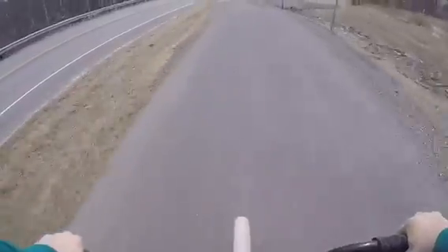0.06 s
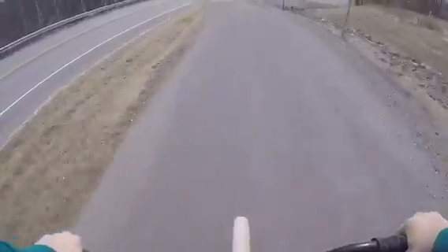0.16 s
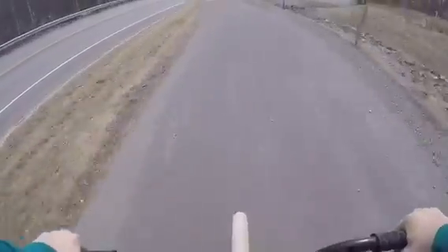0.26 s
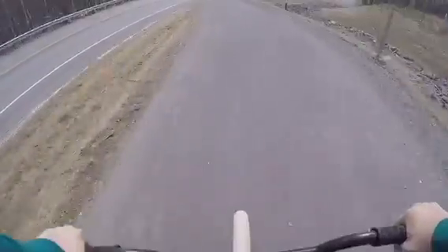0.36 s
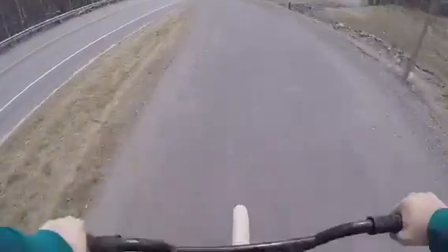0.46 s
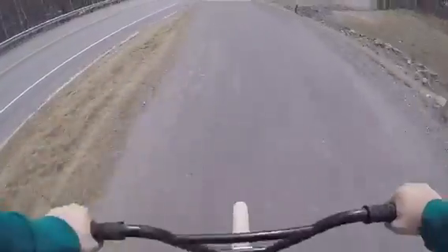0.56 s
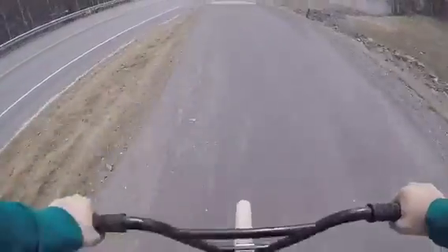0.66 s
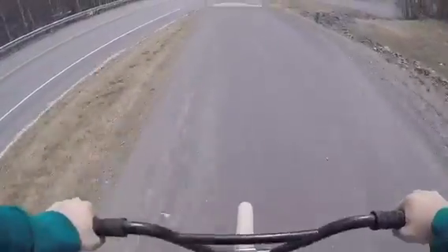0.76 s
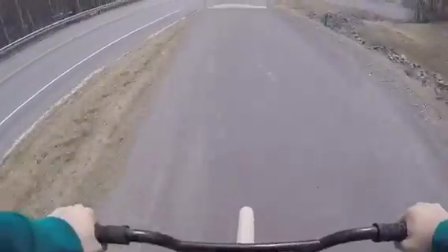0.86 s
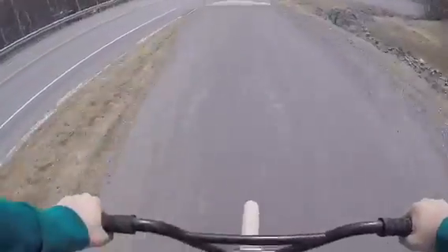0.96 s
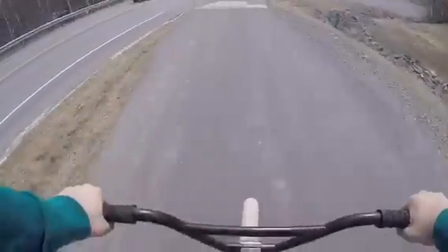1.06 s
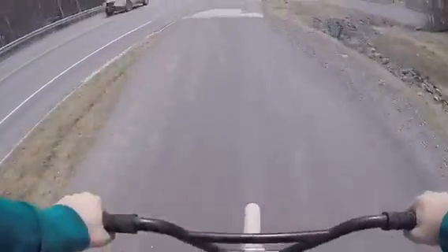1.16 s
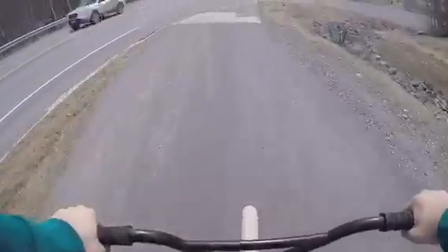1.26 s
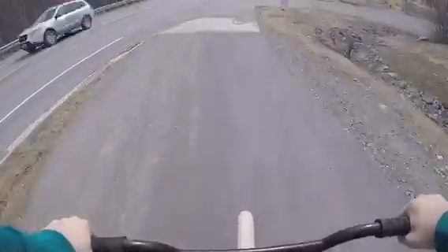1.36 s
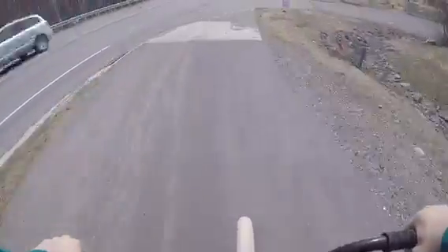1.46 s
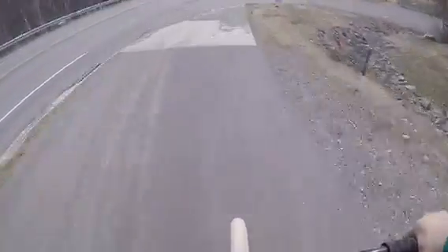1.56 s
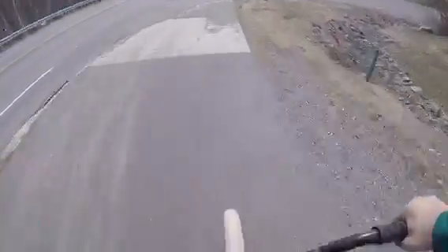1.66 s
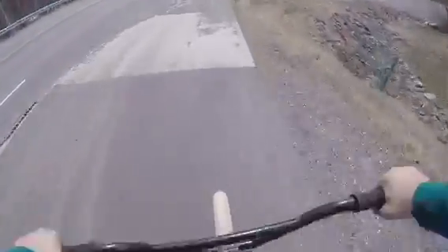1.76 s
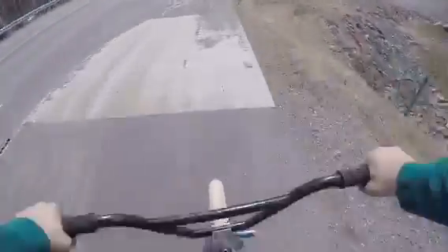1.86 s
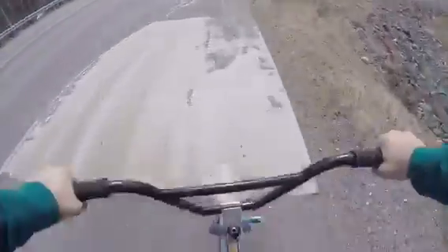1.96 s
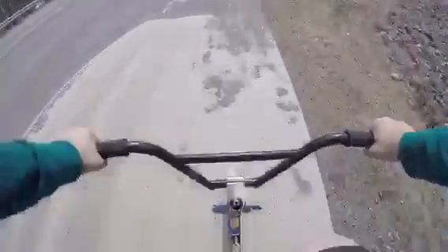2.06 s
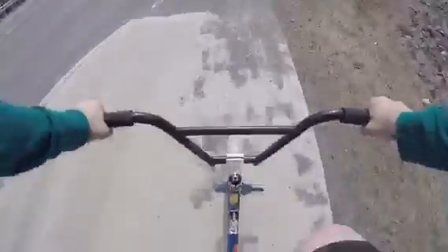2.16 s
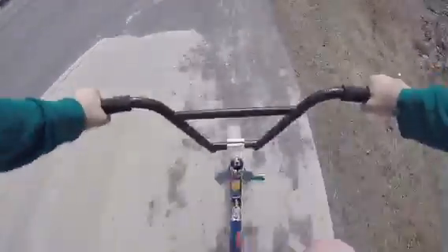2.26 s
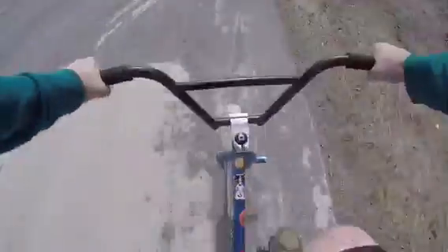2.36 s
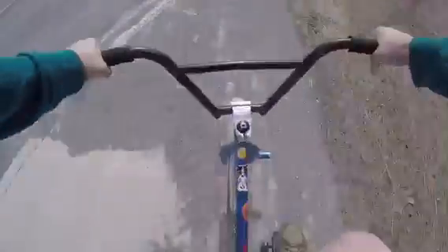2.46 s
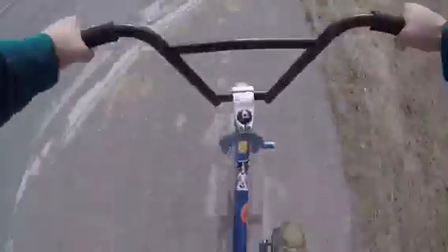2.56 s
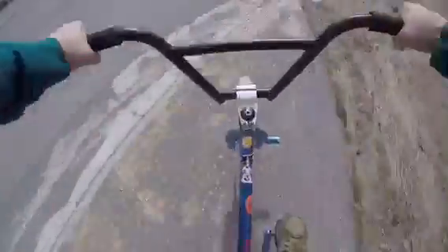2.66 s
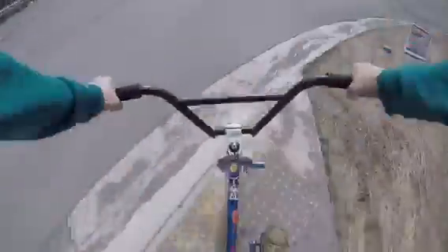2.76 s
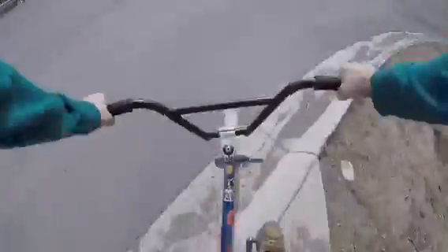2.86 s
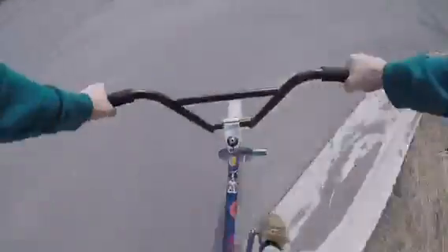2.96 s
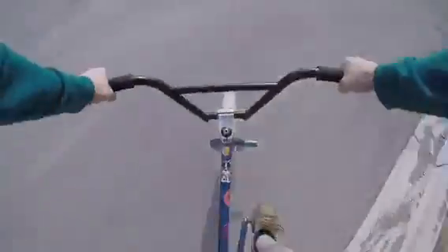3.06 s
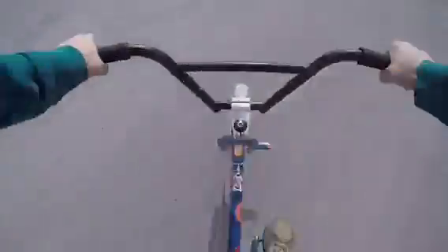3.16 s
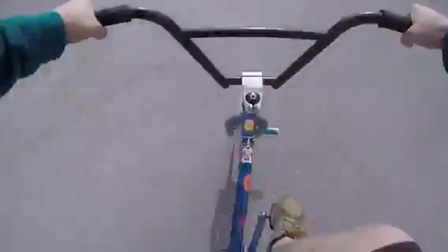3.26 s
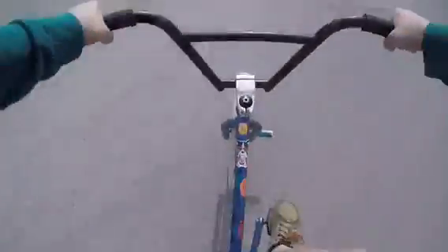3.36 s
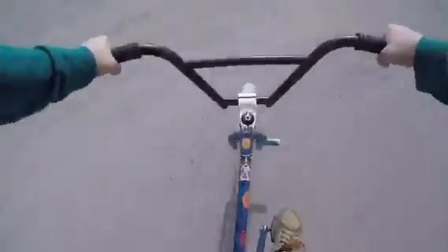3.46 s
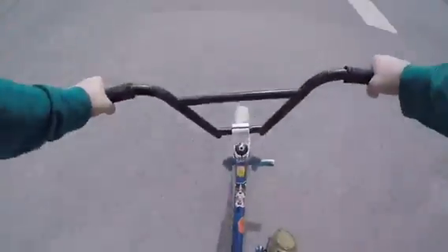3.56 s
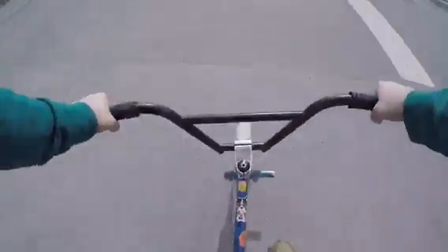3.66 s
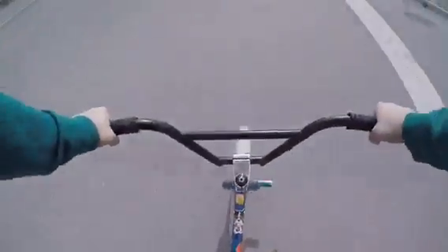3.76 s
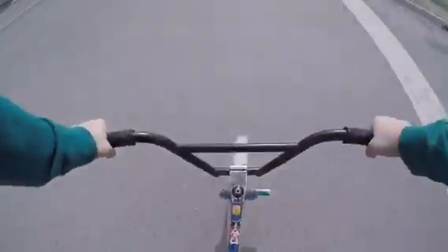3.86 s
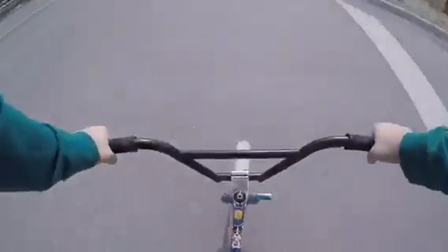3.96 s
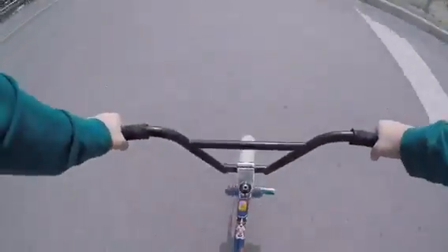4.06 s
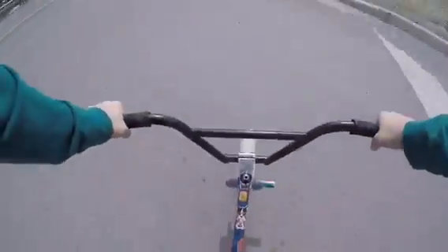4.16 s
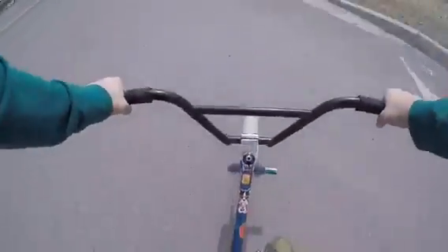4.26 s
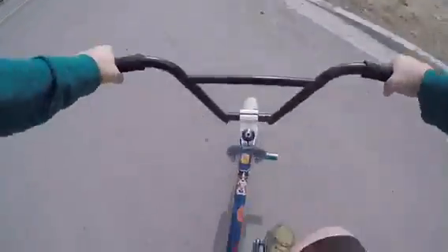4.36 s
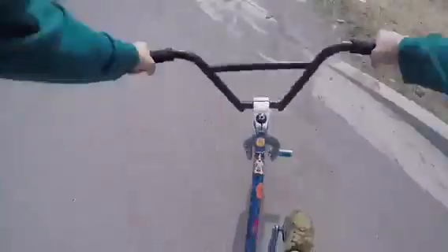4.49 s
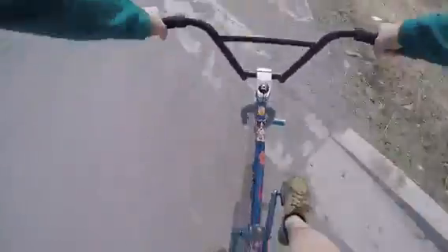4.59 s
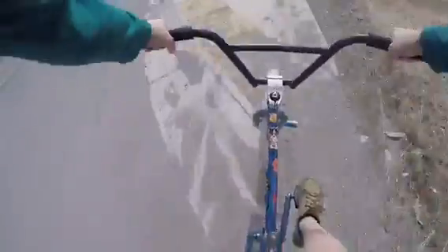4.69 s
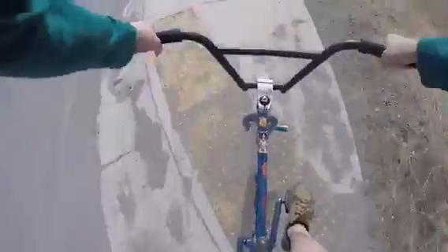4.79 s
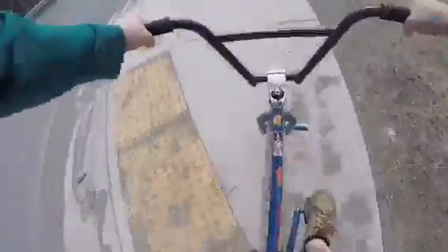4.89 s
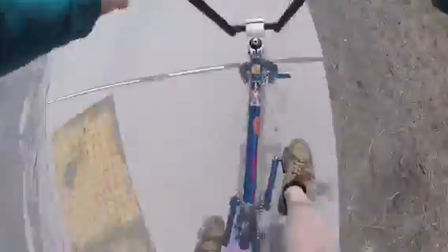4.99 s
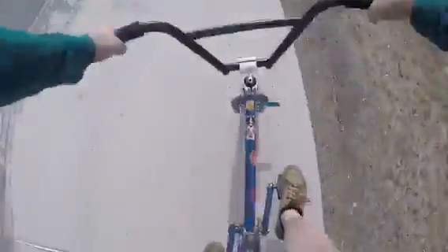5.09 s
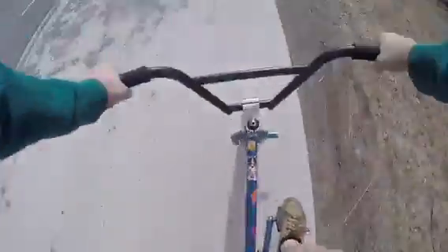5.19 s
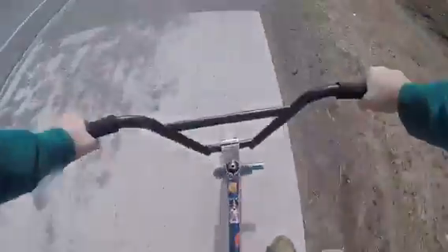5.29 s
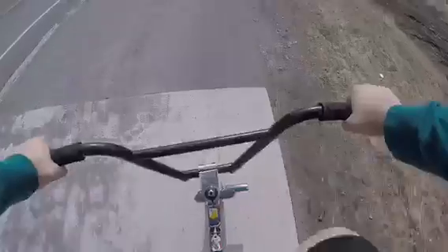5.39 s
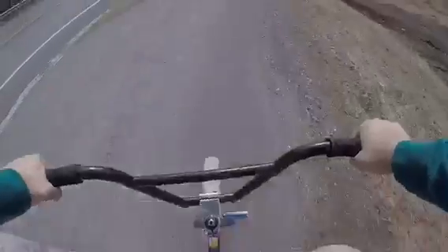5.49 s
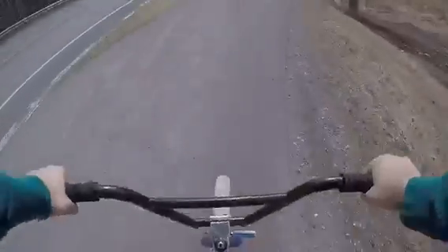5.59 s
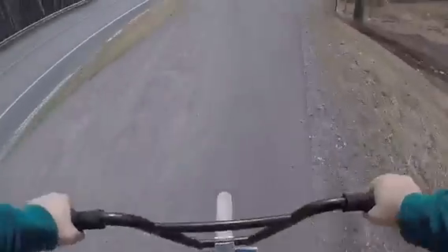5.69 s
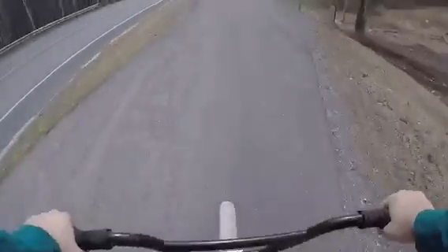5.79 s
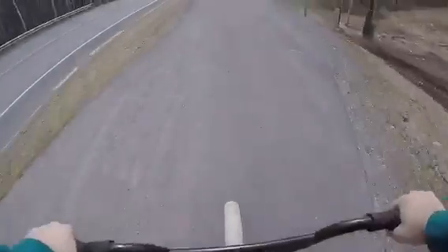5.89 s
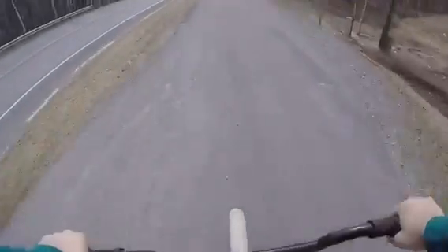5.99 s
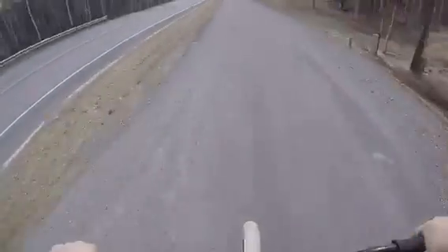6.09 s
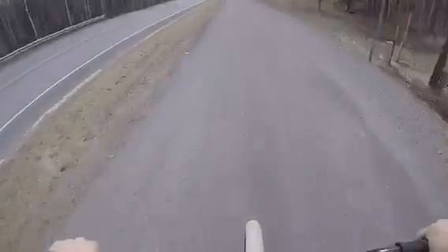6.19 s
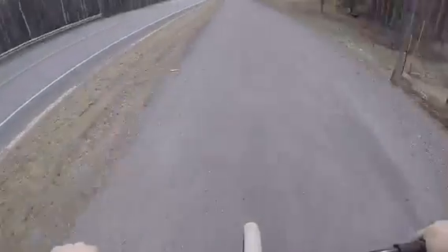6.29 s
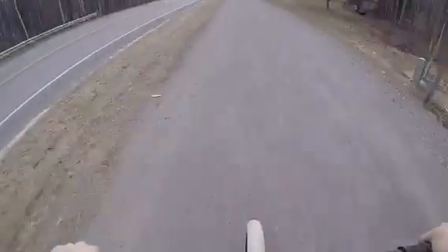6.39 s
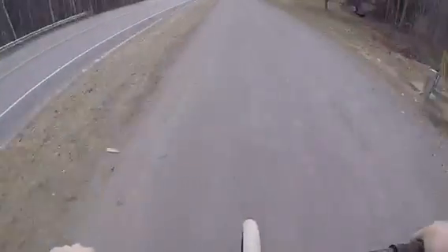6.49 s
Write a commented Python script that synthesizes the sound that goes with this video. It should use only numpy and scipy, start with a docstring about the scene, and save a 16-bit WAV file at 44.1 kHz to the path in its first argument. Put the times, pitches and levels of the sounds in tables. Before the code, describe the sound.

A small bike rolls fast down a paved hill, heard close from a cased camera on the rider's chest. Tyre rush, thin air hiss and low gusting wind run throughout. From about 0.4 to 1.6 seconds the rim brake scrapes and squeals in high, wavering, stuttering chirps. A car passes faintly around 1.5 to 2.2 seconds. From 2 seconds the tyres grow rougher over grit, and small stones tick on the frame. Jolts begin near 2.6 seconds, building to a hard kerb bang at 3.2, with clacking bike parts, hollow mount knocks and deep thumps. After a smoother second, another cluster starts around 4.5 seconds and peaks with a sharp bang at 5. A few light knocks follow near 5.6 seconds, then steady rolling and wind continue until about 6.5 seconds.

```python
"""A small bike rolls fast down a paved hill: the rim brake scrapes and squeals by stick-slip, then the
tyres rush over grit and bang across two kerbs. Stones tick on the frame; jolts knock the camera mount.
A car passes; wind and body shake rumble below. Heard from a cased camera on the rider's chest,
whose walls colour the noise from outside."""
import sys
import numpy as np
from scipy import signal
from scipy.fft import rfft, irfft
from scipy.io import wavfile
from scipy.ndimage import uniform_filter1d

SR = 44100
rng = np.random.default_rng(int(sys.argv[2]) if len(sys.argv) > 2 else 0)


def unload_wav(signal):
    """Save mono or channel-first audio to the path in sys.argv[1] as 16-bit WAV at rate SR, clipped to [-1, 1]."""
    wavfile.write(
        sys.argv[1],
        SR,
        np.round(np.clip(np.atleast_2d(signal).T, -1, 1) * 32767).astype(np.int16),
    )


N = 288414
TIME_S = np.arange(N) / SR

# camera case resonances: f/Hz, width/Hz, gain/dB
CASE_MODES = [(1098, 87, 2.1), (1613, 116, 6.1), (2241, 31, 2.4), (2405, 48, 6.8), (2656, 35, 3.5),
              (2868, 148, 10.3), (3372, 78, 10.2), (3574, 50, -1.7), (3811, 111, 8.4), (4521, 290, 7.3),
              (5344, 29, 3.1), (5863, 203, -4.8), (6387, 105, 5.9), (6648, 34, 3.9), (7075, 61, 8.1),
              (7663, 137, 5.9), (7923, 40, 7.7), (8367, 230, 8.6), (9416, 66, 5.7), (9789, 779, 8.0),
              (9884, 34, 3.4), (10897, 72, -3.4), (11475, 44, 6.5), (11616, 45, 4.4), (13363, 228, 4.4),
              (13591, 35, 3.8), (13673, 34, 3.7)]
# spectral shapes ahead of the case: f/Hz, relative density/dB
WIND_SPECTRUM = [(4, -35), (15, 8.5), (23, 9.5), (38, -4.5), (55, -11), (85, -34), (160, -29.5), (400, -71)]
CAR_SPECTRUM = [(200, -11.5), (500, -7.5), (750, 4.5), (1200, -13), (1900, 0), (3000, -13), (6000, -50.5)]
AIR_SPECTRUM = [(3000, -10.5), (5500, 7), (8000, 3.5), (10000, 0.5), (12000, 0), (14000, -2.5),
                (15500, -4.5)]
ROAD_SPECTRUM = [(40, 7), (80, 11), (150, 10), (210, -1), (350, 0), (550, -8.5), (900, -1.5), (1350, -8.5),
                 (2500, -24), (6000, -34), (15000, -63.5)]
TREAD_SPECTRUM = [(40, -21.5), (200, -17), (500, -7.5), (900, -7.5), (1350, -12), (2000, -4.5),
                  (2500, -2.5), (4000, -12.5), (5500, -23), (9000, -43), (12000, -54), (15000, -71)]
SCRAPE_SPECTRUM = [(100, -49.5), (300, -26), (550, -24), (850, -7.5), (1350, -12), (1900, -8.5),
                   (2300, 4.5), (2700, -13.5), (3200, -16.5), (4800, -20.5), (5500, -24.5), (8000, -34),
                   (12000, -55.5), (15000, -46)]
OVERTONE_SPECTRUM = [(100, -75), (3200, -22), (3850, -6), (4350, -13.5), (4880, 9.5), (5200, -8),
                     (5600, -2), (6400, -19), (7600, -11.5), (9000, -30.5), (15000, -35)]
CLACK_SPECTRUM = [(100, -12), (500, -3), (1300, -3), (2000, 0), (2500, -1), (3200, -9), (5000, -17),
                  (8000, -29), (15000, -41)]

# wind gusts: centre t/s, length/s, rise/dB
WIND_GUSTS = [(0.27, 0.51, 9), (0.88, 0.46, 14), (1.36, 0.33, 12.5), (2.0, 0.99, 5.5), (2.9, 0.86, 9.5),
              (3.36, 0.16, 12), (3.93, 0.12, 9.5), (4.92, 0.32, 12), (5.72, 0.34, 12.5), (6.02, 0.11, 10.5),
              (6.35, 0.42, 5)]
# passing car: t/s, level/dB
CAR_PASS = [(1.1, -91), (1.6, -39), (1.85, -41.5), (2.3, -51), (3.0, -84)]
# bumps through the rider's body: t/s, level/dB, f/Hz
BODY_BUMPS = [(2.581, -9.5, 26.8), (2.614, -9.5, 28), (2.843, -5.5, 29.6), (3.193, -4.5, 26.8),
              (3.232, -6.5, 28.8), (3.341, -3, 68), (4.607, -2.5, 46.2), (5.038, 0, 35.3),
              (5.595, -14.5, 27), (5.706, -16, 35.5)]
# pace as air hiss gain, lost under braking, regained downhill: t/s, gain/dB
RIDE_PACE = [(0, 4), (.4, -1), (1.65, -5.5), (2.15, -3), (2.6, 0), (3.5, -4), (3.8, -3), (4.9, 0.5),
             (5.7, -2.5), (6.54, -4.5)]
# rough paving: centre t/s, length/s, rush rise/dB, drone rise/dB
ROUGH_PATCHES = [(2.15, 0.58, -4, 6.5), (2.56, 0.56, 9, -1), (2.8, 0.44, -0.5, 12), (3.32, 0.22, 2, 12),
                 (3.75, 0.41, 1.5, 4.5), (4.56, .17, 7, 16), (4.95, 0.18, 8, 15), (5.44, 0.41, 0.5, 7.5),
                 (5.95, 0.1, 1, 4.5)]
# frame resonances: f/Hz, width/Hz, gain/dB
FRAME_MODES = [(2380, 31, -15.5), (2650, 60, -9.5), (3297, 23, -23), (4590, 14, -24.5)]
# stones on the frame: t/s, level/dB
STONE_HITS = [(1.954, -28.5), (2.2407, -29.5), (2.3428, -25.5), (2.436, -28), (2.5476, -24.5),
              (3.1676, -29), (4.0841, -29), (4.328, -31.5), (4.3501, -26.5), (4.8742, -20.5), (6.1464, -28)]
# pad pressure on the rim: t/s, gain/dB
PAD_PRESSURE = [(0.38, -9.5), (0.48, -7), (0.53, 0.5), (0.8, 1), (1.02, -3), (1.25, 0), (1.52, -2.5),
                (1.61, -6.5)]
# out-of-true rim rubbing the pad: centre t/s, length/s, rise/dB
RIM_RUBS = [(0.53, 0.028, 6.5), (0.615, 0.093, 4), (0.925, 0.057, 6), (1.025, 0.093, 11), (1.205, 0.063, 6),
            (1.365, 0.062, 5), (1.52, 0.13, 5.5)]
# pad grips, rim sings: centre t/s, length/s, level/dB, f/Hz
PAD_GRIPS = [(0.4, .006, -23.5, 2300), (0.605, .005, -10, 2750), (0.656, .03, -15.5, 2580),
             (0.697, 0.0041, -11, 2630), (0.768, 0.0079, -8, 2770), (0.815, 0.0078, -6, 2450),
             (0.821, .008, -10.5, 2204), (0.832, .006, -10.5, 2728), (0.864, .007, -8, 2660),
             (0.876, 0.021, -11.5, 2480), (0.991, .008, -15, 2523), (1.008, 0.026, -15, 2540),
             (1.116, 0.097, -10.5, 2489), (1.192, 0.017, -11, 2477), (1.222, .009, -11, 2690),
             (1.268, 0.063, -12, 2470), (1.326, 0.0475, -14, 2545), (1.402, .028, -11, 2450),
             (1.429, 0.021, -10, 2660)]
# spells of brief catches: start t/s, end t/s, level/dB
CHIRP_SPELLS = [(0.454, .54, -27.5), (0.541, .8, -19.5), (1.01, 1.07, -16.5), (1.24, 1.47, -16),
                (1.48, 1.57, -28)]
# camera mount resonances: f/Hz, gain/dB, t60/s
MOUNT_MODES = [(137, 1.5, 0.065), (186, -1.5, 0.023), (332, -1.5, 0.035), (440, 1, 0.026),
               (573, -7.5, 0.058), (777, 9, 0.009), (917, 6, 0.015), (1100, -0.5, 0.019), (1240, -27, 0.12)]
# jolts: t/s, knock level/dB, clack level/dB, chatter decay/s, blow centre f/Hz
JOLTS = [(2.579, -17, -23.5, 0.0066, 646), (2.693, -23.5, -38, 0.0008, 600),
         (2.825, -26, -23.5, 0.008, 744), (3.205, -4, -10.5, 0.0019, 790), (3.245, -20.5, -47, 0.0017, 220),
         (3.307, -12.5, -27, 0.0034, 680), (3.3338, -10.5, -19.5, 0.0041, 750),
         (4.39, -38, -40, 0.0035, 696), (4.536, -27, -28.5, 0.012, 1000), (4.573, -17.5, -30, 0.0011, 1140),
         (4.592, -13, -19, 0.0096, 510), (4.635, -24, -45, .0012, 925), (4.704, -24, -34, 0.0014, 1050),
         (4.995, -2.5, -26, 0.00061, 1020), (5.018, -19, -21, 0.011, 434), (5.069, -23.5, -32, 0.0023, 746),
         (5.47, -34.5, -37, 0.012, 900), (5.578, -29.5, -32, 0.0034, 199), (5.7, -26, -51, 0.0046, 220)]

WIND_DB, AIR_DB, DRONE_DB, RUSH_DB = -33.5, -53.5, -45, -37  # base gains
RUSH_PER_PACE, DRONE_PER_PACE = 0.47, 0.65  # dB/dB
TICK_HZ, TICK_CHATTER_S = 2960, 0.0024
GRIT_PER_S, GRIT_RE_RUSH_DB, GRIT_SPREAD_DB = 6.5, -1.5, 6
SCRAPE_DB, SIMMER_DB = -27.5, -25.5  # base gains
CHIRPS_PER_S, CHIRP_S, CHIRP_SPREAD_DB = 38, 0.0049, 1
CHIRP_HZ, CHIRP_DETUNE = 2673, .025  # upper rim mode
RASP_HZ, RASP_WIDTH_HZ, RASP_DB = 2600, 190, -12  # second rim mode
MOUNT_LAG_S, REBOUND_S, REBOUND_KNOCK_DB, REBOUND_CLACK_DB = 0.00209, 0.022, -19, -13.5
CUTOFF_HZ = 15200


def gain(db):
    """dB to amplitude factor."""
    return 10 ** (np.asarray(db) / 20)


def unit_rms(x):
    """Scale to rms 1."""
    return x / np.sqrt(np.mean(x ** 2) + 1e-20)


def envelope(rows):
    """(t/s, level/dB) curve to gain per sample."""
    return gain(np.interp(TIME_S, *np.transpose(rows)))


def swells(rows, column=2):
    """Gaussian rises (t/s, length/s, rise/dB) to gain per sample."""
    return gain(sum(row[column] * np.exp(-(2 * (TIME_S - row[0]) / row[1]) ** 2) for row in rows))


def add(mix, at_s, sound):
    """Mix in a sound at at_s."""
    part = mix[max(round(at_s * SR), 0):][:len(sound)]
    part += sound[:len(part)]


def wander(rate_hz):
    """Low-passed noise, rms 1."""
    hz = np.fft.rfftfreq(N, 1 / SR)
    return unit_rms(irfft(rfft(rng.standard_normal(N)) / (1 + (hz / rate_hz) ** 4), N))


def noisy_mode(hz, width_hz):
    """Randomly driven resonance, rms 1."""
    phase = 2 * np.pi * hz * TIME_S
    return wander(width_hz) * np.cos(phase) + wander(width_hz) * np.sin(phase)


def grains(per_s, spread_db):
    """Random clicks, mostly small, rms 1."""
    sizes = gain(spread_db * np.minimum(rng.exponential(1, N), 4))
    return unit_rms(sizes * rng.choice([-1, 1], N) * (rng.random(N) < per_s / SR))


def case_response(spectrum, size=4096):
    """Minimum-phase impulse response of a spectrum plus the case modes, energy 1."""
    hz = abs(np.fft.fftfreq(size, 1 / SR))
    points_hz, points_db = np.transpose(spectrum)
    source_db = np.interp(np.log(hz + 1), np.log(points_hz + 1), points_db)
    case_db = sum(db * np.exp(-.5 * ((hz - mode_hz) / width_hz) ** 2)
                  for mode_hz, width_hz, db in CASE_MODES)
    log_gain = np.log(gain(source_db + case_db))
    taps = np.fft.ifft(np.exp(np.conj(signal.hilbert(log_gain)))).real
    return taps / np.linalg.norm(taps)


def through_case(x, spectrum, size=4096):
    """Filter by a spectrum and the case."""
    return signal.oaconvolve(x, case_response(spectrum, size))[:N]


def strike(ring, db, chatter_s, looseness):
    """Impulse plus decaying chatter drives a ring; db is the peak 5 ms rms."""
    t = np.arange(len(ring)) / SR
    force = rng.standard_normal(len(t)) * np.exp(-t / chatter_s)
    force *= looseness / np.linalg.norm(force)
    force[0] += 1
    sound = signal.fftconvolve(force, ring)[:len(t)]
    return gain(db) * sound / np.sqrt(uniform_filter1d(sound ** 2, size=220).max())


def wind():
    """Slow pressure lumps on the case, swelling in gusts."""
    lumps = signal.hilbert(through_case(rng.standard_normal(N), WIND_SPECTRUM, size=32768))
    strength = np.sqrt(uniform_filter1d(abs(lumps) ** 2, size=6000))
    return unit_rms(lumps.real / strength) * gain(WIND_DB) * swells(WIND_GUSTS)


def car():
    """Distant tyre roar swells and fades."""
    return through_case(rng.standard_normal(N), CAR_SPECTRUM) * envelope(CAR_PASS)


def body_thumps():
    """The body shoves the case: a pressure dip between two smaller swells."""
    out, t = np.zeros(N), np.arange(-SR // 8, SR // 8) / SR
    for at_s, db, hz in BODY_BUMPS:
        pulse = ((1 - 2j * np.pi * hz * t / 3) ** -4).real
        add(out, at_s + t[0], -gain(db) * pulse)
    return out


def rush_gain():
    """Tyre rush follows pace and paving."""
    return gain(RUSH_DB) * envelope(RIDE_PACE) ** RUSH_PER_PACE * swells(ROUGH_PATCHES)


def tyres():
    """Tread rushes and crunches over grit and shakes the frame; the road drones, air hisses past."""
    texture, pace = wander(28), envelope(RIDE_PACE)
    contact = gain(-2.5) * rng.standard_normal(N) + gain(-10) * grains(per_s=600, spread_db=0.5)
    rush = through_case(contact * gain(2.2 * texture), TREAD_SPECTRUM) * gain(-1.04)
    rush = signal.sosfilt(signal.butter(2, 8000, fs=SR, output="sos"), rush)
    frame = sum(gain(db) * noisy_mode(hz, width_hz) for hz, width_hz, db in FRAME_MODES)
    hiss = through_case(rng.standard_normal(N) * gain(0.33 * texture), AIR_SPECTRUM)
    hiss *= gain(AIR_DB) * pace
    drone = through_case(rng.standard_normal(N) * gain(0.95 * wander(18)), ROAD_SPECTRUM)
    drone *= gain(DRONE_DB) * pace ** DRONE_PER_PACE * swells(ROUGH_PATCHES, column=3)
    return (rush + frame) * rush_gain() + hiss + drone


def stone_ticks():
    """Stones and random grit ring the frame near its pitch; grit level follows the tyre rush."""
    out, grit_db = np.zeros(N), 20 * np.log10(rush_gain()) + GRIT_RE_RUSH_DB
    gap_draws, size_draws = rng.random((200, 2)).T
    times_s = np.cumsum(-np.log(gap_draws) / GRIT_PER_S)
    grit = [(at_s, grit_db[int(at_s * SR)] + GRIT_SPREAD_DB * (2 * size - 1))
            for at_s, size in zip(times_s, size_draws) if at_s < TIME_S[-1]]
    for at_s, db in STONE_HITS + grit:
        hz = TICK_HZ * (1 + 0.059 * rng.standard_normal())
        ring = case_response([(200, -27), (1200, -17), (0.4 * hz, -7), (hz, 0), (1.26 * hz, -7),
                              (7000, -23), (15000, -40)])
        add(out, at_s, strike(ring, db, TICK_CHATTER_S, looseness=4))
    return out


def chirp_grips():
    """The pad catches briefly at uneven intervals; rows as in PAD_GRIPS."""
    rows = []
    for start_s, end_s, db in CHIRP_SPELLS:
        slots_s = np.arange(start_s, end_s, 1 / CHIRPS_PER_S)
        for slot_s, (late, drop, detune) in zip(slots_s, rng.uniform(-1, 1, (40, 3))):
            at_s = slot_s + .5 * abs(late) / CHIRPS_PER_S
            hz = CHIRP_HZ * (1 + CHIRP_DETUNE * detune)
            rows.append((at_s, CHIRP_S, db - CHIRP_SPREAD_DB * drop, hz))
    return rows


def squeals():
    """Stick-slip: wavering tone, rough overtones, friction spray. Returns sound and grip envelope."""
    tone, grip = np.zeros(N), np.zeros(N)
    waver, flutter = .012 * wander(120), gain(1.6 * wander(200))
    for at_s, length_s, db, hz in PAD_GRIPS + chirp_grips():
        span = slice(round((at_s - 2 * length_s) * SR), round((at_s + 2 * length_s) * SR))
        swell = gain(db) * flutter[span] / (1 + abs(2 * (TIME_S[span] - at_s) / length_s) ** 4)
        unsteady = np.sqrt(0.05 / length_s)  # longer grip, tighter pitch lock
        cycles = np.cumsum(hz * (1 + unsteady * waver[span])) / SR + rng.random()
        tone[span] += swell * np.sin(2 * np.pi * cycles)
        grip[span] += swell
    # uneven slips smear each overtone into a band
    second = noisy_mode(4880, 140) * uniform_filter1d(grip, size=700) * gain(-29.5)
    third = noisy_mode(7680, 200) * grip * gain(-44.5)
    spray = through_case(rng.standard_normal(N) * grip, OVERTONE_SPECTRUM) * gain(-26)
    rasp = noisy_mode(RASP_HZ, RASP_WIDTH_HZ) * grip * gain(RASP_DB)
    return tone + rasp + second + third + spray, grip


def brake():
    """The pad scrapes in uneven slips, keeps the rim simmering and squeals when it grips."""
    squeal, grip = squeals()
    pressure = np.interp(TIME_S, [.37, .42, 1.57, 1.6], [0, 1, 1, 0]) * envelope(PAD_PRESSURE)
    sliding = gain(-18 * uniform_filter1d(grip, size=1500))  # held grip ducks the scrape
    slips = gain(1.84 * wander(35))
    friction = unit_rms(rng.standard_normal(N) + 0.89 * grains(per_s=1500, spread_db=3.5))
    scrape = through_case(friction * slips * sliding, SCRAPE_SPECTRUM)
    scrape += gain(-24.5) * noisy_mode(3870, 76)
    simmer = (noisy_mode(2750, 110) + gain(-6) * noisy_mode(2480, 70)) * sliding
    return squeal + pressure * (scrape * swells(RIM_RUBS) * gain(SCRAPE_DB) + simmer * gain(SIMMER_DB))


def knocks():
    """Each jolt clacks the bike's loose parts, rings the camera mount and rebounds once."""
    out, t = np.zeros(N), np.arange(4096) / SR
    clack = case_response(CLACK_SPECTRUM)
    onset = 1 - np.exp(-(t / 0.0013) ** 2)  # mount yields before it rings
    bounces = (0, 0, 0), (REBOUND_S, REBOUND_KNOCK_DB, REBOUND_CLACK_DB)
    for at_s, knock_db, clack_db, chatter_s, blow_hz in JOLTS:
        ring = np.zeros(len(t))
        for hz, db, t60_s in MOUNT_MODES:
            mode_db = db - 5.9 * abs(np.log2(hz / blow_hz))  # modes nearest the blow's centre pitch ring loudest
            ring += gain(mode_db - 60 * t / t60_s) * np.sin(2 * np.pi * hz * t)
        for delay_s, knock_trim_db, clack_trim_db in bounces:
            knock = strike(onset * ring, knock_db + knock_trim_db, chatter_s, chatter_s / 0.0026)
            add(out, at_s + delay_s + MOUNT_LAG_S, knock)
            add(out, at_s + delay_s, strike(clack, clack_db + clack_trim_db, chatter_s, looseness=25))
    return out


def scene():
    """Mono sum at the microphone."""
    return (tyres() + wind() + knocks() + body_thumps() + car() + brake() + stone_ticks())[None]


def record(dry):
    """Soft clip near full scale, then low-pass."""
    clipped = dry / (1 + abs(dry / .97) ** 8) ** (1 / 8)
    lowpass = signal.firwin(511, CUTOFF_HZ, window=("kaiser", 9), fs=SR)
    return signal.oaconvolve(clipped, lowpass[None], "same")


dry = scene()
out = record(dry)
unload_wav(out)
```